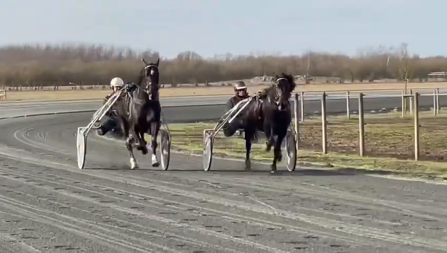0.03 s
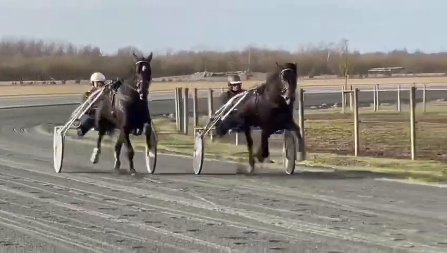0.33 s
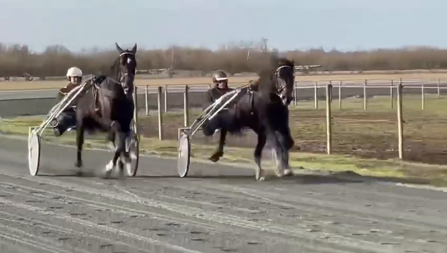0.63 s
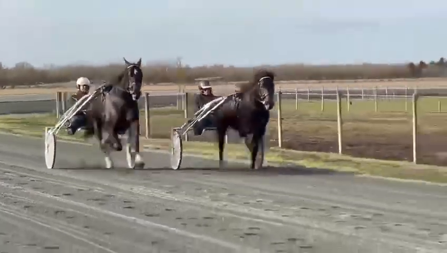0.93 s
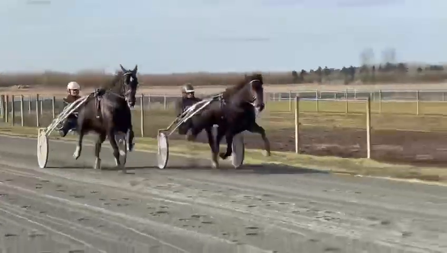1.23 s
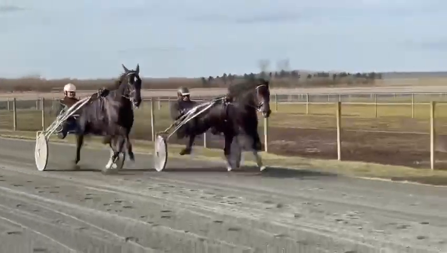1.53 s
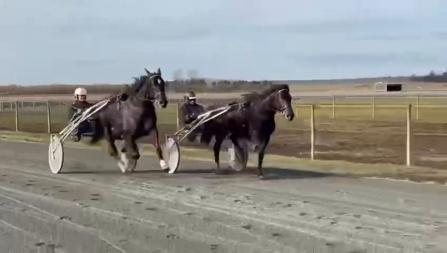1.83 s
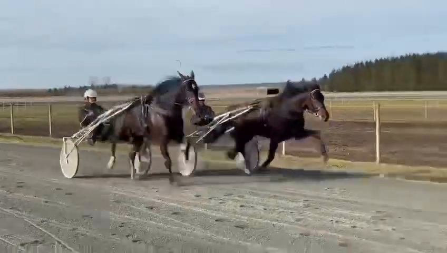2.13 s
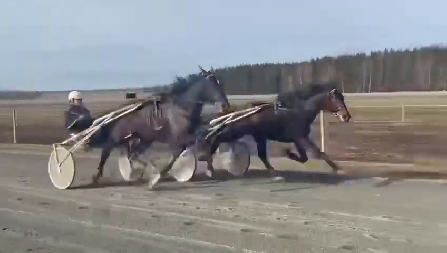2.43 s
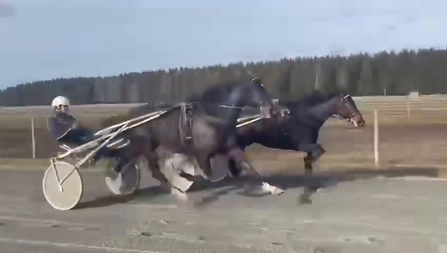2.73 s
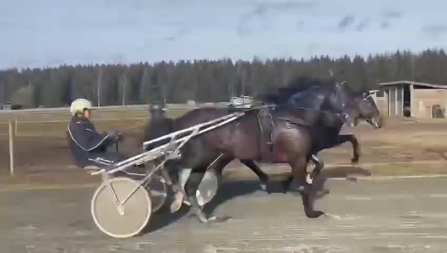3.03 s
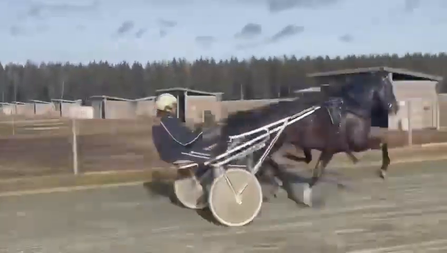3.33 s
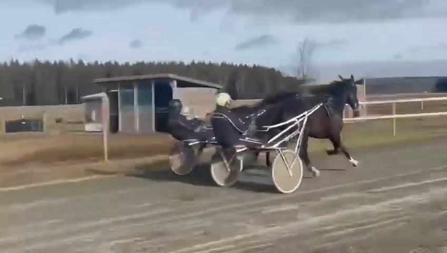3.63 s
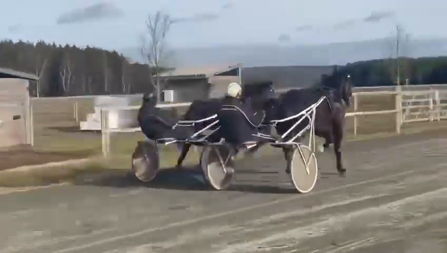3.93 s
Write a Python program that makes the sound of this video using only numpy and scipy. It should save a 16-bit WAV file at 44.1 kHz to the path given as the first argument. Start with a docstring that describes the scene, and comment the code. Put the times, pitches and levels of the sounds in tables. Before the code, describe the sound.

Trotting horses pull light carts past on crunching gravel, with gusts buffeting the microphone.

```python
"""Beside a gravel track, with a stereo microphone out in the wind. From the start gusts buffet its
ports while, some way off, two trotting horses draw light carts over crunching gravel. Each hoof
lands with a dull clop, and grit sprays up. From about 1 s flung stones tick on the carts, and from
about 2 s harness and shafts knock. The teams pass closest just before 3 s, loud and bright,
then draw away under more gusts."""
import sys
import numpy as np
from scipy import signal
from scipy.fft import rfft, irfft
from scipy.io import wavfile
from scipy.ndimage import uniform_filter1d

SR = 44100
rng = np.random.default_rng(int(sys.argv[2]) if len(sys.argv) > 2 else 0)


def inscribe(sig):
    """Save sig as 16-bit PCM at rate SR to the path in sys.argv[1].

    A 1-D sig is mono; a 2-D sig holds one channel per row.
    Samples are clipped to [-1, 1] before scaling.
    """
    pcm = np.round(np.clip(np.atleast_2d(sig).T, -1, 1) * 32767)
    wavfile.write(sys.argv[1], SR, pcm.astype(np.int16))


N = 176400
T = np.arange(N) / SR
FREQS = np.fft.rfftfreq(N, 1 / SR) + 1

# wind on the microphone: time_s, level_db, brightness_db
GUSTS = [(0, -38.5, -14), (.48, -52, 5.5), (.65, -37, -7), (.93, -49, -10), (1.3, -52.5, 7),
         (1.49, -28, -11), (1.63, -25, -12), (1.69, -31.5, -13.5), (1.81, -29, -14), (1.87, -29, -2.5),
         (1.99, -28, 0.5), (2.14, -19.5, 0), (2.2, -26, -5.5), (2.33, -23, -3.5), (2.47, -25.5, 5.5),
         (2.56, -22, -2), (2.66, -21.5, -10), (2.73, -30.5, -20), (2.81, -28, -7), (2.94, -39.5, -17),
         (3.02, -37, -6), (3.066, -18, -4.5), (3.16, -18.5, -8.5), (3.27, -18, 3.5), (3.30, -24.5, -3),
         (3.44, -22.5, -7.5), (3.62, -30, -7.5), (3.73, -22, -6.5), (3.87, -31.5, -3), (4, -29, 6)]
# turbulence reaching the ports: frequency_hz, level_db
WIND_SPECTRUM = [(22, -30), (60, -2.5), (150, 0), (270, -2.5), (500, -8), (900, -15.5), (2500, -57.5),
                 (6000, -58)]
# eddies, large to small: centre_hz, brightness_share, flicker_db
EDDIES = [(66.5, -0.57, -6.5), (175, -0.023, 3), (380, 0.9, 4), (800, 1.1, 5), (1590, 1.73, 7.5)]
# breeze that never stops: frequency_hz, level_db
BREEZE_SPECTRUM = [(18, -38), (35, -4), (60, 2.5), (110, -15), (2000, -86)]
# wheels nearing and leaving: time_s, level_db
WHEEL_LEVELS = [(0, -52), (1.1, -48.5), (1.65, -47), (2.0, -42.5), (2.35, -40), (2.65, -36), (3.0, -39),
                (3.25, -37.5), (3.35, -42), (3.55, -41), (4, -43.5)]
# gravel under the tyres: frequency_hz, level_db
CRUNCH_SPECTRUM = [(60, 2), (300, 1.5), (600, 5), (1100, 0), (2000, 2), (4000, -3.5), (7000, -17),
                   (9000, -6), (11000, -17), (13000, -43)]
# hoof falls, each pitch taken midway down its glide: start_s, level_db, pitch_hz
HOOF_FALLS = [(0.024, -30, 298), (0.065, -31, 494), (.178, -35, 604), (.298, -29, 504), (0.321, -29.5, 510),
              (.402, -26.5, 447), (.512, -23.5, 485), (0.528, -27.5, 406), (.613, -20, 652),
              (.723, -25.5, 560), (.839, -22, 527), (.951, -29.5, 508), (0.975, -29, 427),
              (1.056, -30, 830), (1.163, -21, 630), (1.277, -22, 270), (1.391, -21.5, 535),
              (1.44, -27.5, 587), (1.494, -26, 800), (1.512, -21, 302), (1.549, -26, 470),
              (1.603, -19, 530), (1.651, -15, 298), (1.712, -20, 600), (1.792, -18.5, 440),
              (1.81, -14, 310), (1.850, -23, 720), (1.884, -17.5, 480), (1.930, -11.5, 550),
              (2.022, -19, 600), (2.040, -16, 600), (2.129, -13.5, 780), (2.147, -10, 667),
              (2.177, -15, 646), (2.219, -15.5, 388), (2.359, -11, 610), (2.413, -15, 690),
              (2.432, -9, 870), (2.482, -8, 770), (2.509, -11, 826), (2.556, -13.5, 327),
              (2.595, -13.5, 261), (2.620, -13, 595), (2.634, -14, 850), (2.735, -14.5, 269),
              (2.801, -23, 776), (2.944, -19, 650), (3.03, -14, 404), (3.061, -10, 250), (3.079, -8.5, 428),
              (3.140, -10, 329), (3.183, -10, 380), (3.204, -15.5, 800), (3.211, -8, 274),
              (3.248, -9.5, 445), (3.264, -7.5, 644), (3.332, -19.5, 895), (3.661, -23, 447),
              (3.734, -20, 420), (3.845, -18.5, 537), (3.906, -25, 644)]
# ground struck by a hoof: frequency_hz, level_db
THUD_SPECTRUM = [(30, -6.5), (200, 7.5), (550, -5), (1000, -26), (6000, -49)]
# grit thrown by hooves and wheels, coarse scuffs to fine sand: start_s, level_db, focus_hz
GRIT_SPRAYS = [(.065, -60, 3600), (0.151, -49.5, 1800), (.40, -50, 2800), (.51, -52, 3000),
               (.613, -50, 3500), (.745, -48.5, 2500), (.84, -52, 2000), (1.057, -47.5, 2100),
               (1.172, -45.5, 1900), (1.277, -54, 3200), (1.39, -48, 2220), (1.49, -48, 2000),
               (1.619, -48.5, 4960), (1.713, -42.5, 1700), (1.815, -43.5, 9600), (1.93, -45, 2200),
               (2.045, -46, 10000), (2.148, -38.5, 3000), (2.358, -44, 2400), (2.557, -36.5, 2400),
               (2.793, -38.5, 2800), (2.87, -48, 2530), (2.98, -41.5, 2210), (3.024, -37.5, 2980),
               (3.194, -42, 2200), (3.380, -35.5, 6000), (3.487, -37, 3920), (3.575, -40.5, 10000),
               (3.728, -42.5, 4070), (3.85, -49.5, 9600)]
# scattering grit: frequency_hz, level_db
GRIT_SPECTRUM = [(200, -18), (900, 7), (4000, -5), (8500, -13), (11000, -9), (13000, -40)]
# stones pinging off the carts: start_s, level_db, pitch_hz
STONE_TICKS = [(0.914, -41.5, 4950), (1.349, -46.5, 9300), (2.583, -31, 10400), (2.602, -25.5, 8900),
               (3.232, -41, 5900), (3.29, -33.5, 10400), (3.718, -37.5, 10700), (3.966, -40.5, 9500)]
# knocks of harness and shafts: start_s, level_db, pitch_hz
HARNESS_KNOCKS = [(1.93, -35, 2040), (2.745, -25, 1900), (3.44, -34.5, 2130), (3.664, -31, 1940)]
# phase between the microphone's ports: frequency_hz, left_lead_rad
PORT_PHASE = [(250, 0), (600, .3), (900, -.3), (1380, 0), (5500, 0), (5860, -1.1), (6400, 0), (7100, -.3),
              (7600, -3), (10100, -3.3), (11800, -6.1)]
# balance between the ports: frequency_hz, left_minus_right_db
PORT_BALANCE = [(350, 0), (640, 3), (1160, 2.5), (1700, 0), (10000, 0), (11500, -3.3)]

WIDTH_DB, GRAVEL_WIDTH_DB = -10.5, -36  # share that differs between the ports
WIND_CUT_HZ = 79  # the ports shed the largest eddies
FLICKER_PER_HZ, BREEZE_DB = 0.22, -44
GRAINS_PER_S, GRAIN_SPREAD_DB = 9000, 0.5
PEBBLES_PER_S, PEBBLE_DB, PEBBLE_MID_HZ, PEBBLE_DECAY_CYCLES = 70, -4.5, 2600, 1.2
CLOSEST_S, TREBLE_HZ, CLOSE_TREBLE_DB, AIR_DB_PER_S = 2.99, 7700, 8.5, 4
CLOP_RISE_CYCLES, CLOP_SAG, SAG_S = 0.7, 0.52, 0.0024
CRUMBLE_DB, CRUMBLE_S, CRUMBLE_OCTAVES = -4.5, 0.017, 0.43
THUD_DB, THUD_RISE_S = -8, 0.0057
HOLLOW_START_S, HOLLOW_HZ, HOLLOW_DB, HOLLOW_RISE_S = 0.614, 690, -26.5, 0.0058
SPRAY_RISE_S, SPRAY_FOCUS_DB, SPRAY_OCTAVES, SPRAY_FLICKER_DB = 0.013, 5.5, 0.46, 4.7
CLACK_OCTAVES, RATTLE_OCTAVES, RATTLE_SHARE = 0.34, 0.98, 0.38
TOP_HZ = 12100


def undb(db):
    """Decibels to gain."""
    return 10 ** (np.asarray(db) / 20)


def curve(rows, column=1):
    """One column of a time table, joined by straight lines."""
    rows = np.array(rows)
    return np.interp(T, rows[:, 0], rows[:, column])


def over_pitch(points):
    """(Hz, value) points joined on a log-frequency axis."""
    hz, value = np.array(points).T
    return np.interp(np.log(FREQS), np.log(hz), value)


def hump(hz, octaves):
    """A bell on the log-frequency axis, 1 at its centre."""
    return np.exp(-.5 * (np.log2(FREQS / hz) / octaves) ** 2)


def colour(x, points):
    """Give a signal a spectrum, at rms 1."""
    y = irfft(rfft(x) * undb(over_pitch(points)), N)
    return y / y.std()


def even(x, seconds):
    """Hold a noise at rms 1 over this time span; faster flicker stays."""
    return x / np.sqrt(uniform_filter1d(x ** 2, int(seconds * SR)) + 1e-9)


def wander(rate_hz):
    """A smooth random drift with spread 1."""
    y = irfft(rfft(rng.standard_normal(N)) * np.exp(-(FREQS / rate_hz) ** 2), N)
    return y / y.std()


def swell(start, rise_s):
    """A burst that peaks at 1 after its rise time and dies away."""
    age = np.maximum(T - start, 0) / rise_s
    return age * np.exp(1 - np.minimum(age, 50))


def ports(pair, width_db):
    """Left and right from a common and a differing signal."""
    return pair[0] + undb(width_db) * pair[1] * np.array([[1], [-1]])


def wind():
    """Gusts flutter right on the ports over a low breeze; smaller eddies flicker faster."""
    air = rfft(colour(rng.standard_normal((2, N)), WIND_SPECTRUM)) / np.hypot(1, WIND_CUT_HZ / FREQS)
    brightness_db = curve(GUSTS, column=2)
    buffeting = 0
    for hz, share, flicker_db in EDDIES:
        passband = over_pitch([(row[0], float(row[0] == hz)) for row in EDDIES])
        band = irfft(air * passband, N) * undb(flicker_db * wander(FLICKER_PER_HZ * hz))
        buffeting += band.std() * even(band, seconds=.045) * undb(share * brightness_db)
    breeze = undb(BREEZE_DB) * colour(rng.standard_normal((2, N)), BREEZE_SPECTRUM)
    return ports(buffeting * undb(curve(GUSTS)) + breeze, WIDTH_DB)


def gravel(spectrum):
    """A dense stream of tiny stone contacts of random strength, nearly alike at both ports."""
    size = undb(GRAIN_SPREAD_DB * np.minimum(rng.exponential(size=(2, N)), 6))
    contacts = rng.random((2, N)) < GRAINS_PER_S / SR
    grains = contacts * size * rng.standard_normal((2, N))
    return ports(colour(grains, spectrum), GRAVEL_WIDTH_DB)


def pebbles():
    """Lone stones snap under the tyres at random, each with its own pitch and strength."""
    snaps, age = np.zeros(N), T[:SR // 100]
    for when, tune, size in rng.random((int(PEBBLES_PER_S * N / SR), 3)):
        first = int(when * (N - len(age)))
        cycles = age * PEBBLE_MID_HZ * 2 ** (2 * tune - 1)
        ring = np.exp(-cycles / PEBBLE_DECAY_CYCLES) * np.sin(2 * np.pi * cycles)
        snaps[first:first + len(age)] += 2 * size ** 2 * ring
    return undb(PEBBLE_DB) * snaps


def wheels():
    """Tyres crunch unevenly over the gravel, louder as they near the microphone."""
    level_db = curve(WHEEL_LEVELS) + wander(rate_hz=25)
    return undb(level_db) * (gravel(CRUNCH_SPECTRUM) + pebbles())


def through_air(x):
    """Gravel is bright up close and loses its top with distance along the track."""
    low = irfft(rfft(x) / (1 + (FREQS / TREBLE_HZ) ** 6), N)
    treble_db = CLOSE_TREBLE_DB - AIR_DB_PER_S * abs(T - CLOSEST_S)
    return low + (x - low) * undb(treble_db)


def clop(start, hz):
    """A hoof meets packed ground: a few cycles whose pitch starts high and sinks as it beds in."""
    sound, first = np.zeros(N), int(start * SR)
    age = T[:max(min(SR // 10, N - first), 0)]
    cycles = hz * ((1 - CLOP_SAG) * age + 2 * CLOP_SAG * SAG_S * (1 - np.exp(-age / SAG_S)))
    rise = age * hz / CLOP_RISE_CYCLES
    sound[first:first + len(age)] = rise * np.exp(1 - rise) * np.sin(2 * np.pi * cycles)
    return sound


def hooves():
    """Each hoof clops, four clods give way under it and the ground thuds; one hoof rings hollow."""
    clops, thud_level = np.zeros((2, N))
    for (start, db, hz), clods in zip(HOOF_FALLS, rng.random((len(HOOF_FALLS), 4, 2))):
        crumble = 0
        for late, tune in clods:
            clod_hz = hz * 2 ** (CRUMBLE_OCTAVES * (2 * tune - 1))
            crumble += clop(start + 1 / hz + CRUMBLE_S * late, clod_hz)
        clops += undb(db) * (clop(start, hz) + undb(CRUMBLE_DB) * crumble / np.sqrt(len(clods)))
        thud_level += undb(db + THUD_DB) * swell(start, THUD_RISE_S)
    hollow = undb(HOLLOW_DB) * swell(HOLLOW_START_S, HOLLOW_RISE_S) * np.sin(2 * np.pi * HOLLOW_HZ * T)
    ground = even(colour(rng.standard_normal((2, N)), THUD_SPECTRUM), 2 * THUD_RISE_S)
    return clops + hollow + thud_level * ports(ground, WIDTH_DB)


def grit():
    """Sprays of gravel swell and patter out, each favouring its own grain size."""
    grains = rfft(gravel(GRIT_SPECTRUM))
    sprays = 0
    for start, db, hz in GRIT_SPRAYS:
        spray = irfft(grains * undb(SPRAY_FOCUS_DB * hump(hz, SPRAY_OCTAVES)), N)
        sprays += undb(db) * swell(start, SPRAY_RISE_S) * spray / spray.std()
    return sprays * undb(SPRAY_FLICKER_DB * wander(rate_hz=70))


def clack(noise_spectrum, start, db, hz, rise_s):
    """A hit on a cart: one rough resonance with a broad rattle around it."""
    resonance = hump(hz, CLACK_OCTAVES) + RATTLE_SHARE * hump(hz, RATTLE_OCTAVES)
    ring = even(irfft(noise_spectrum * resonance, N), 2 * rise_s)
    return undb(db) * swell(start, rise_s) * ring


def carts():
    """Flung stones tick on the frames; harness and shafts knock lower and longer."""
    noise_spectrum = rfft(rng.standard_normal(N))
    ticks = sum(clack(noise_spectrum, *row, rise_s=0.0016) for row in STONE_TICKS)
    knocks = sum(clack(noise_spectrum, *row, rise_s=0.0033) for row in HARNESS_KNOCKS)
    return ticks + knocks


def scene():
    """Both teams and the wind, heard from the edge of the track."""
    return hooves() + through_air(grit() + wheels()) + carts() + wind()


def record(dry):
    """The microphone rounds the peaks, its ports differ in phase and level, and the top is cut."""
    fades = np.minimum(np.minimum(T, T[-1] - T) / .004, 1)
    rounded = fades * np.tanh(dry)
    left_response = np.exp(.5j * over_pitch(PORT_PHASE)) * undb(over_pitch(PORT_BALANCE) / 2)
    heard = irfft(rfft(rounded) * np.array([left_response, 1 / left_response]), N)
    return signal.sosfilt(signal.ellip(10, .2, 80, TOP_HZ, fs=SR, output="sos"), heard)


dry = scene()
out = record(dry)
inscribe(out)
```